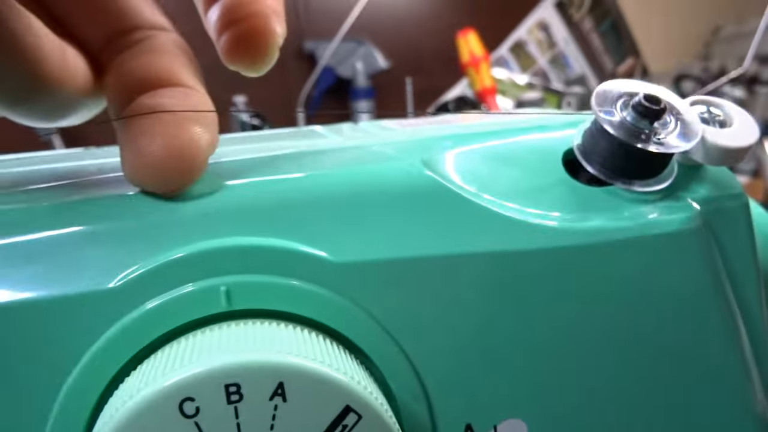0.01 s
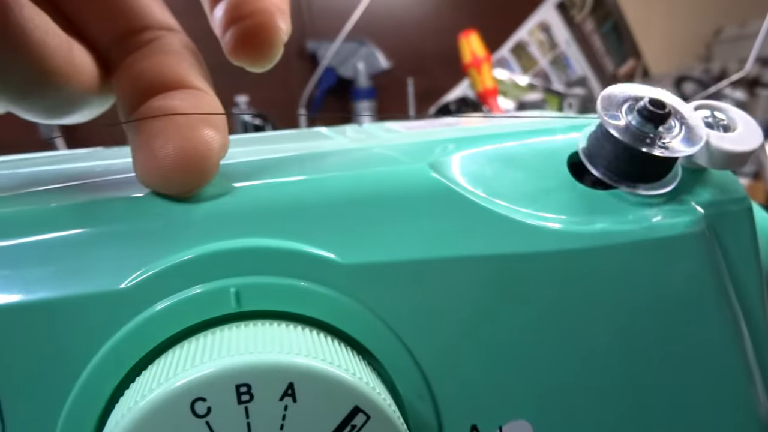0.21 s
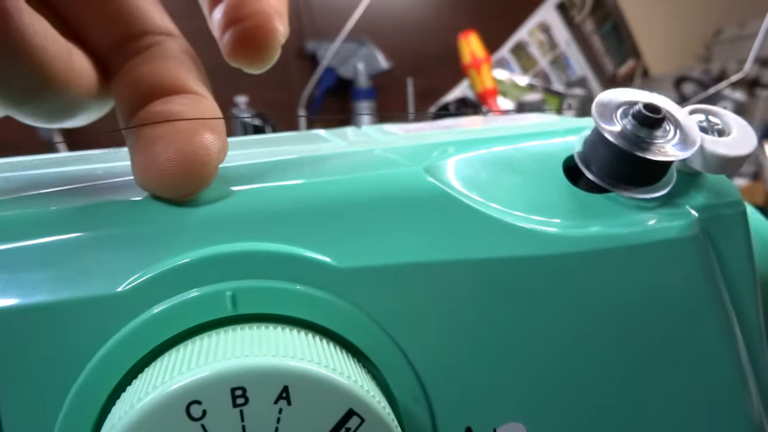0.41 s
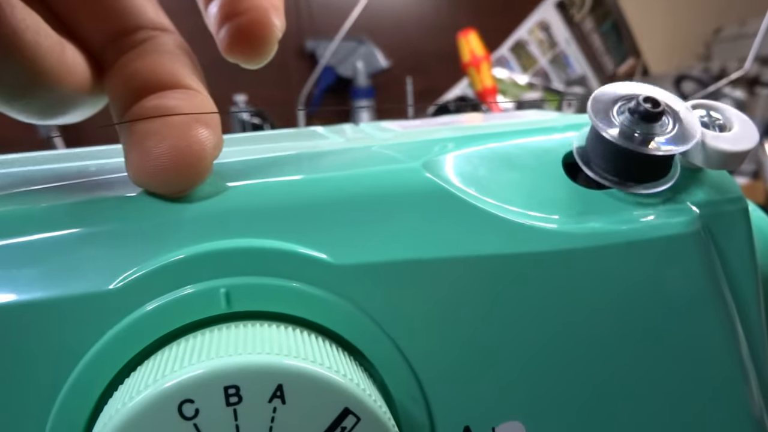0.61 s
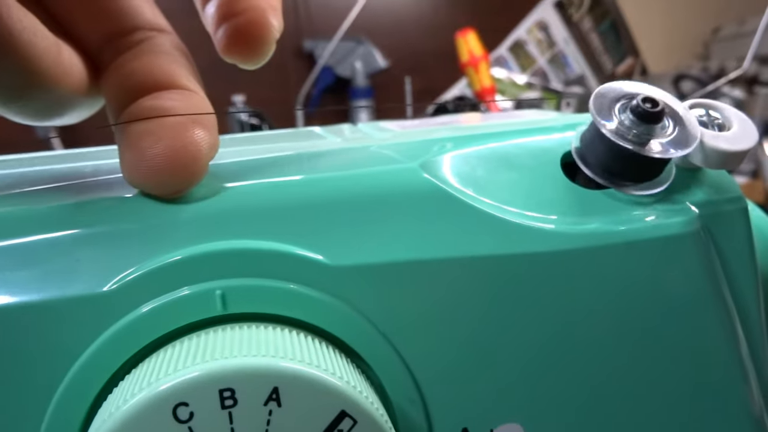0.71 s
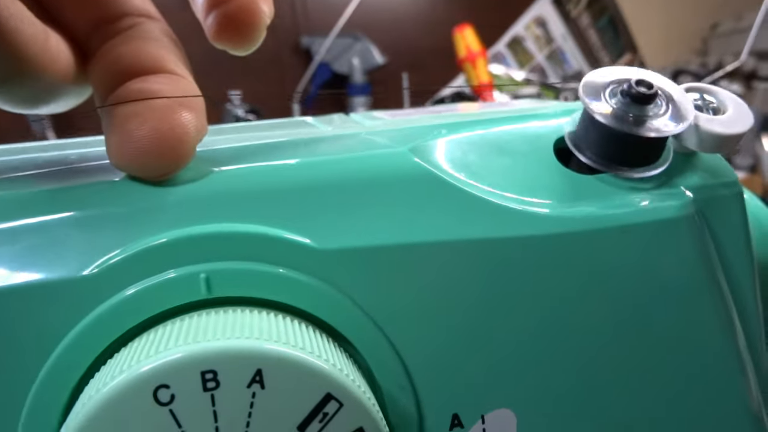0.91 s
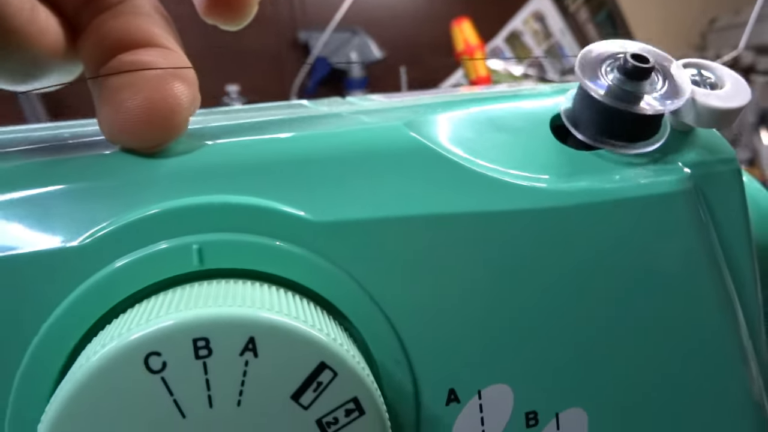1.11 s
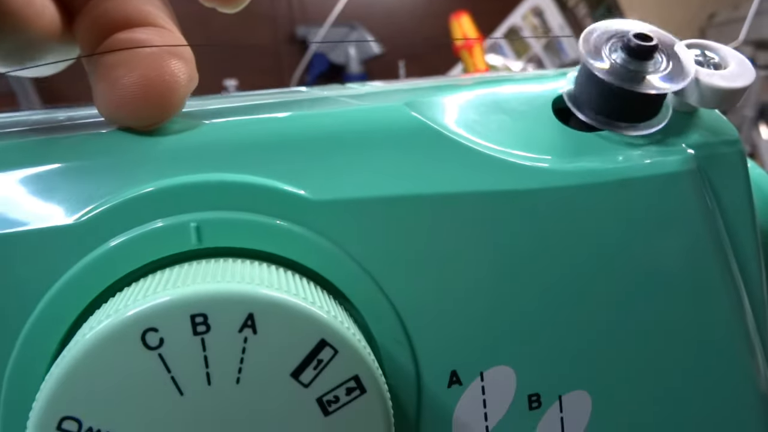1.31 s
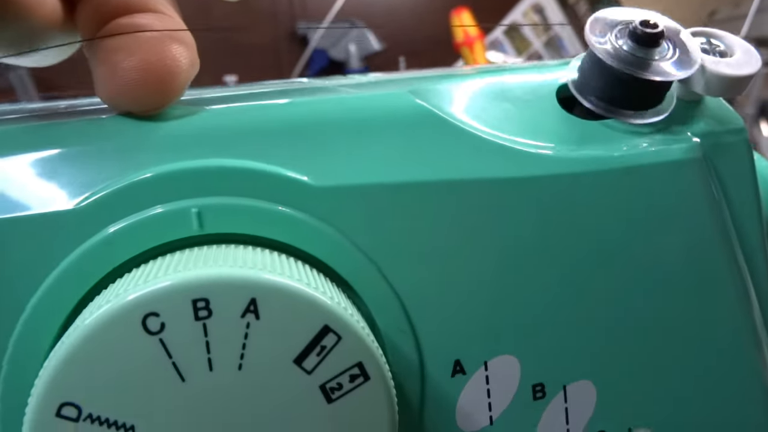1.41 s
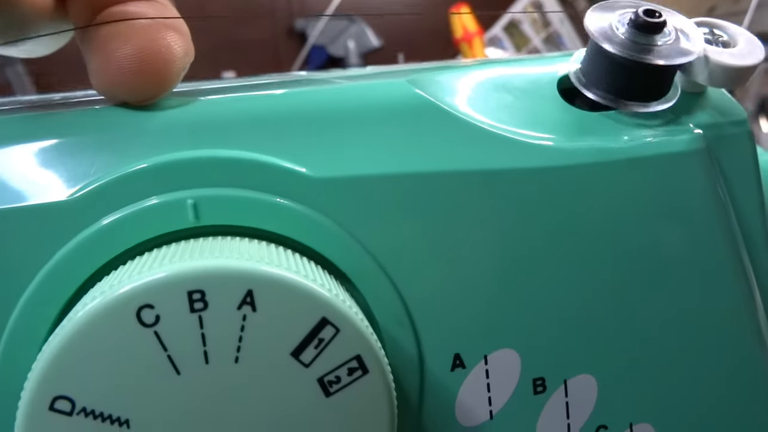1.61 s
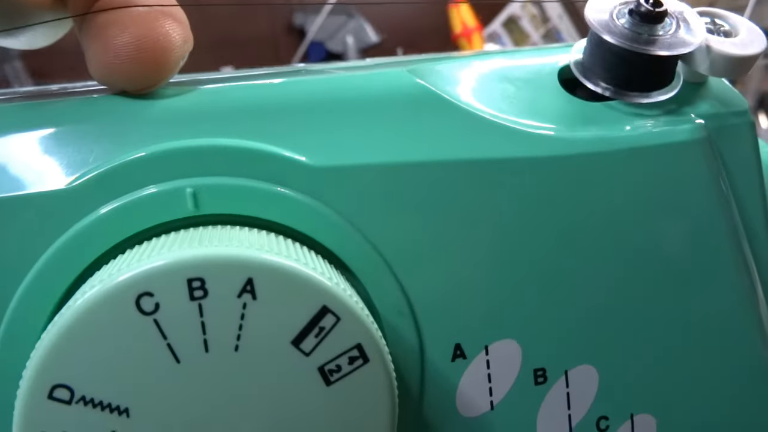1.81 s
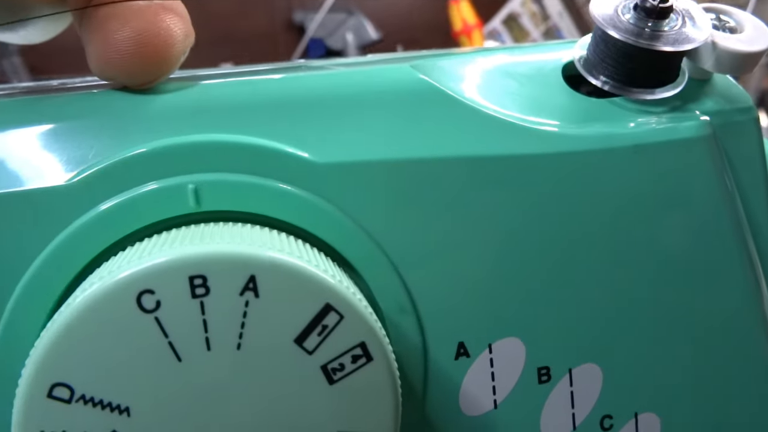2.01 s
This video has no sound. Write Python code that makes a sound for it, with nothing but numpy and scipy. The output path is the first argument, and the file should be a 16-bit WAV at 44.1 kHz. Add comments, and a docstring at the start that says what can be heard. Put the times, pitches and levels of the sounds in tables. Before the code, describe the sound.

A sewing machine motor winds a bobbin up close: a rough whine climbs quickly, plastic housing rattles and whirrs at full speed with metallic ticks, then it slows into separate knocks and stops in a small quiet room.

```python
"""A small room, microphone close to a sewing machine winding a bobbin in one short burst of the pedal.
The motor runs up with a rough wavering whine, and the shell drones at full speed over a mains hum.
Random contacts in the drive whirr and rattle the plastic housing; the bobbin ticks as ringing noise bursts.
As it coasts down the rattle fades to separate swelling knocks, with one strong knock near the end."""
import sys
import numpy as np
from scipy import signal
from scipy.fft import rfft, irfft, next_fast_len
from scipy.io import wavfile

SR = 44100
rng = np.random.default_rng(int(sys.argv[2]) if len(sys.argv) > 2 else 0)


def unload_wav(signal):
    """Save mono or channel-first audio to the path in sys.argv[1] as 16-bit WAV at rate SR, clipped to [-1, 1]."""
    wavfile.write(
        sys.argv[1],
        SR,
        np.round(np.clip(np.atleast_2d(signal).T, -1, 1) * 32767).astype(np.int16),
    )


N = 90405
T = np.arange(N) / SR  # time in s


def amp(db):
    """Decibels to gain."""
    return 10 ** (np.asarray(db) / 20)


def unit(x):
    """Scale to rms 1."""
    return x / np.sqrt(np.mean(x ** 2) + 1e-20)


def curve(rows):
    """Each column of a table after the first, joined by straight lines in time."""
    s, *columns = np.transpose(rows)
    return [np.interp(T, s, c) for c in columns]


def drift(rate_hz):
    """Random wander of rms 1: noise through two equal low-pass poles at the given rate."""
    r = np.exp(-2 * np.pi * rate_hz / SR)
    noise = rng.standard_normal(2 * N)
    return unit(signal.lfilter([1], [1, -2 * r, r * r], noise)[N:])  # settled half only


def colour(x, points):
    """Causal minimum-phase filter through the given [freq_hz, level_db] points."""
    size = 2 * next_fast_len(N)
    hz, db = np.transpose(points)
    bins_hz = np.arange(size // 2 + 1) * SR / size
    response_db = np.interp(np.log(bins_hz + 1), np.log(hz), db)
    cepstrum = irfft(np.log(amp(response_db)))
    cepstrum[1:size // 2] *= 2  # folding the cepstrum makes the filter causal
    cepstrum[size // 2 + 1:] = 0
    return irfft(rfft(x, size) * np.exp(rfft(cepstrum)))[..., :N]


def highpass(x, hz):
    """Second-order cut of the bass."""
    return signal.sosfilt(signal.butter(2, hz, "high", fs=SR, output="sos"), x)


def ring(x, hz, t60):
    """A resonant mode: a unit click sets a sine of height 1 ringing, down 60 dB after t60 seconds."""
    r, w = np.exp(-np.log(1000) / (t60 * SR)), 2 * np.pi * hz / SR
    return signal.lfilter([0, np.sin(w)], [1, -2 * r * np.cos(w), r * r], x + 1e-18)


def clicks(s, db):
    """Single-sample clicks at given times and levels."""
    return np.bincount((np.abs(s) * SR).astype(int), amp(db), N)[:N]


def grains(per_s, spread_db):
    """Random contacts of uneven size and either sign, at a given mean rate."""
    sizes = amp(spread_db * np.minimum(rng.exponential(1, N), 3))
    signed = sizes * rng.choice([-1, 1], N)
    return unit(signed * (rng.random(N) < per_s / SR))


def tone(hz, db, jitter, flutter_db, rate):
    """A sine that wavers at random in pitch (jitter, a fraction) and strength (flutter)."""
    phase = 2 * np.pi * np.cumsum(hz * (1 + jitter * drift(rate))) / SR
    strength = unit(amp(flutter_db * drift(rate)))
    return np.sqrt(2) * amp(db) * strength * np.sin(phase)


def room_floor():
    """The quiet room: steady noise, darker than white."""
    # tone of the room noise [freq_hz, level_db]
    floor_colour = [(25, -12), (100, -0.5), (600, -3), (1000, -12), (3000, -17.5), (11000, -21)]
    floor_db = -61
    return amp(floor_db) * unit(colour(rng.standard_normal(N), floor_colour))


def housing(x):
    """The plastic shell rings in its modes, alternating in sign."""
    # modes of the plastic housing [freq_hz, level_db, t60_s]
    modes = [(231.3, -24.5, 0.21), (265.6, -31, 0.16), (348.5, -15, .13), (387, -10.5, 0.088),
             (426.6, -12.5, 0.13), (511.7, -10, .11), (634.8, -2, 0.073), (671.8, -0.5, 0.049),
             (723, -5.5, 0.083), (766.3, -9.5, 0.079), (983, -12, 0.057), (1079, -10.5, 0.084),
             (1223, -11, 0.13), (1463, -19.5, 0.036)]
    return sum((-1) ** k * amp(db) * ring(x, hz, t60) for k, (hz, db, t60) in enumerate(modes))


def knocks():
    """Slack in the drive knocks: a hollow note swells and dies over the housing; the stop rings the frame."""
    # knocks of the slack drive on the housing [start_s, level_db, pitch_hz, swell_s]
    knock_rows = [(0.022, -49, 598, 0.0035), (0.129, -27.5, 660, 0.0046), (0.229, -34, 630, .005),
                  (0.257, -18.5, 694, 0.0137), (0.316, -21.5, 684, 0.0042), (0.465, -18, 630, 0.0086),
                  (0.514, -10.5, 653, .007), (0.628, -17.5, 627, 0.0091), (0.841, -16.5, 682, 0.0074),
                  (0.893, -14, 650, 0.0056), (1.348, -17, 637, 0.0059), (1.364, -18.5, 678, 0.015),
                  (1.435, -22, 685.5, 0.0035), (1.461, -21, 649, 0.0071), (1.485, -24.5, 650, 0.0035),
                  (1.504, -23.5, 663, 0.0058), (1.534, -23, 654, .004), (1.569, -30.5, 690, 0.0031),
                  (1.591, -23.5, 655, 0.0069), (1.644, -22, 658, 0.0065), (1.69, -21.5, 657, 0.0041),
                  (1.719, -28, 695, 0.01), (1.743, -18.5, 723.6, 0.00814), (1.827, -39, 714, 0.0048),
                  (1.852, -44.5, 402, 0.011), (1.947, -50, 600, .004)]
    # tone of the housing behind the knocks [freq_hz, level_db]
    knock_colour = [(40, -37), (200, -7), (350, 6.5), (600, 0.5), (780, 0), (1000, 6), (1300, -4),
                    (3000, -35)]
    # frame modes as the drive comes to rest against it [freq_hz, level_db, t60_s]
    frame = [(386, -41.5, 0.44), (513, -26, 0.21), (793, -30, 0.04), (1430, -36, .07), (1600, -38, 0.12)]
    stop_s, body_db = 1.749, -9.5

    hollow = 0
    for start, db, hz, swell in knock_rows:
        age = np.maximum(T - start, 0)
        envelope = (age / swell * np.exp(1 - age / swell)) ** 2  # peaks at 1 after the swell time
        hollow = hollow + amp(db) * envelope * np.sin(2 * np.pi * hz * age)

    s, db, _, swell = np.transpose(knock_rows)
    strikes = clicks(s + swell / 2, db)  # halfway through each swell time
    body = amp(body_db) * colour(housing(strikes), knock_colour)
    stop = sum((-1) ** k * ring(clicks([stop_s], [db]), hz, t60) for k, (hz, db, t60) in enumerate(frame))
    return hollow + body + highpass(stop, 300)


def drive(speed):
    """Fine contacts whirr, a little bunched on each turn; coarser ones shake the housing and its base."""
    # rattle of the drive in the housing [time_s, level_db]
    rattle_level = [(0, -75), (0.055, -61), (0.08, -41.5), (0.16, -37.5), (0.23, -29.5), (0.44, -27),
                    (0.48, -19.5), (0.6, -22.5), (0.73, -19), (0.8, -26), (0.87, -19.5), (1.1, -24),
                    (1.23, -21.5), (1.38, -27), (1.42, -35), (1.5, -29.5), (1.6, -44), (1.73, -36),
                    (1.8, -46), (1.87, -52.5), (1.92, -57), (2.05, -69)]
    # whirr of belt and brushes [time_s, level_db]
    whirr_level = [(0, -86), (0.055, -76), (0.068, -55), (0.2, -37), (0.44, -30.5), (0.5, -26), (0.66, -27),
                   (1.22, -25.5), (1.36, -31), (1.43, -36.5), (1.52, -40), (1.6, -43), (1.78, -52),
                   (1.92, -63), (2.05, -72)]
    # tone of the whirr [freq_hz, level_db]
    whirr_colour = [(40, -59), (90, -18), (122, -11), (145, -20), (300, -6), (700, -3), (880, -1),
                    (1100, -3), (1600, 1), (2200, -2), (2750, -1.5), (3100, -5.5), (3350, -10), (4000, -12),
                    (4300, -18.5), (4900, -14), (5250, -13), (5500, -19), (6200, -21), (6600, -17.5),
                    (7600, -24), (11000, -23)]
    # brush hiss [time_s, level_db]
    hiss_level = [(0.05, -85), (0.09, -61), (0.18, -45), (0.42, -41.5), (0.55, -41), (1.22, -39),
                  (1.38, -42.5), (1.52, -47.5), (1.68, -61), (1.78, -74), (1.9, -82)]
    # tone of the brush hiss [freq_hz, level_db]
    hiss_colour = [(2000, 15), (4500, -31), (5200, 8), (6000, 2), (7600, -12), (9400, 3), (11000, -11)]
    # low growl in the base [time_s, level_db]
    growl_level = [(0.05, -75), (0.12, -55), (0.5, -49.5), (0.75, -34), (0.92, -40), (1.35, -42.5),
                   (1.5, -39), (1.6, -45.5), (1.75, -52), (1.9, -65.5)]
    # tone of the growl [freq_hz, level_db]
    growl_colour = [(80, -40.5), (150, -24), (172, -18), (198, -27), (227, 7.5), (243, -8.5), (266, -1),
                    (300, -18.5), (355, -3), (425, -6.5), (470, -22.5), (900, -53)]
    whine_per_turn, turn_depth, turn_jitter = 12, .22, .15  # cycles, share, fraction
    grains_per_s, grain_spread_db = 3500, 2.5
    rattles_per_s, rattle_spread_db = 420, 1

    turn_hz = speed / whine_per_turn * (1 + turn_jitter * drift(42.4))
    turns = np.cumsum(turn_hz) / SR
    bunching = 1 + turn_depth * np.cos(2 * np.pi * turns)

    fine = bunching * grains(grains_per_s, grain_spread_db)
    whirr = amp(curve(whirr_level)[0]) * unit(colour(fine, whirr_colour))
    hiss = amp(curve(hiss_level)[0]) * unit(colour(rng.standard_normal(N), hiss_colour))
    shakes = grains(rattles_per_s * bunching, rattle_spread_db)
    rattle = amp(curve(rattle_level)[0]) * unit(housing(shakes))
    growl = amp(curve(growl_level)[0]) * unit(colour(shakes, growl_colour))
    return whirr + hiss + rattle + growl


def motor(speed):
    """Whine broken up by random gain, the housing's drone at full speed, and mains hum while pedalled."""
    # whine of the motor [time_s, level_db]
    whine_level = [(0.06, -67.5), (0.22, -34), (0.275, -33), (0.295, -55), (0.32, -28.5), (0.41, -27),
                   (0.47, -32), (0.8, -38), (1.2, -40), (1.25, -32), (1.355, -24), (1.42, -40.5),
                   (1.7, -66)]
    # drone of the housing at full speed [time_s, pitch_hz, level_db]
    drone_rows = [(0.72, 485, -60), (0.81, 499.2, -34), (0.87, 505, -21.5), (1.03, 514, -27.5),
                  (1.14, 522.2, -32.5), (1.2, 526, -24), (1.28, 497, -53), (1.36, 480, -70)]
    # levels of the first three multiples of the mains [level_db]
    mains_db = [-67, -55, -61]
    rough, rough_hz = 0.83, 160  # depth and rate at which the whine breaks up
    mains_hz = 60.46
    pedal_down_s, pedal_up_s, pedal_fade_s = 0.075, 1.3, 0.035

    whine = tone(speed, curve(whine_level)[0], jitter=.04, flutter_db=1.3, rate=116)
    whine = whine * (1 + rough * drift(rough_hz)) / np.hypot(1, rough)
    drone = tone(*curve(drone_rows), jitter=0.0047, flutter_db=0.3, rate=35)
    pedal = np.clip(np.minimum(T - pedal_down_s, pedal_up_s - T) / pedal_fade_s, 0, 1)
    hum = sum(tone(mains_hz * (k + 1), db, jitter=.015, flutter_db=2.5, rate=10)
              for k, db in enumerate(mains_db))
    return whine + drone + pedal * hum


def bobbin():
    """Each tick is a dying spray of noise and a metallic ring kept going by small after-contacts."""
    # metal ticks of the bobbin on its spindle; brightness is the treble of the spray against its bass
    # [start_s, level_db, brightness_db, ring_hz, ring_db]
    ticks = [(0.064, -54.5, -7, 3100, -56), (0.473, -32, 3.5, 5160, -28), (0.485, -26.5, 5.5, 4868, -18.5),
             (0.524, -29, 1, 4960, -34), (0.551, -25, -1, 10500, -28), (0.59, -38, -9, 6900, -22),
             (0.615, -32, -0.5, 6950, -41), (0.712, -24, -6.5, 2696, -22), (0.836, -22.5, 0, 2745, -20),
             (0.94, -22.5, -7.5, 5513, -35), (1.214, -30.5, 2.5, 2715, -30), (1.242, -39, -4, 5010, -37),
             (1.324, -31.5, 2, 10290, -18), (1.494, -27, -13, 2460, -29), (1.572, -48, -8, 2686, -37),
             (1.644, -35.5, -5, 2680, -25.5), (1.645, -46, -13, 6840, -33), (1.654, -41, -23, 7160, -52),
             (1.719, -40.5, -22, 3600, -47), (1.751, -38, -33, 2610, -36.5), (1.76, -39, -31, 1520, -34.5),
             (1.792, -60, -15, 2616, -42), (1.845, -66, -5, 2600, -48.5), (1.948, -44, -13, 1610, -52)]
    # tone of the spray [freq_hz, level_db]
    tick_colour = [(200, -38), (900, -17), (1650, 10.5), (3500, -2.5), (4900, 5.5), (5900, -1), (6700, 3.5),
                   (7700, -1.5), (10500, -4)]
    spray_t60_s, split_hz = 0.069, 2900
    ring_cycles = 165  # cycles for a ring to fall 60 dB
    pair_split, pair_db = 0.039, -16  # each mode is a close pair: fractional spacing, second's level
    chatter_share, chatter_s = 0.84, 0.009  # strength and decay time of the after-contacts

    s, db, bright_db, _, _ = np.transpose(ticks)
    spray = unit(colour(rng.standard_normal(N), tick_colour))
    low, high = (signal.sosfilt(signal.butter(3, split_hz, kind, fs=SR, output="sos"), spray)
                 for kind in ("low", "high"))
    spray_fade = np.exp(-np.log(1000) / (spray_t60_s * SR))
    strikes = [clicks(s, db), clicks(s, db + bright_db)]
    dull, bright = signal.lfilter([1], [1, -spray_fade], strikes)
    out = low * dull - high * bright

    chatter = chatter_share * rng.standard_normal(N) * np.sqrt(2 / (chatter_s * SR))
    chatter_fade = np.exp(-1 / (chatter_s * SR))
    for start, _, _, hz, ring_db in ticks:
        hit = clicks([start], [ring_db])
        after = chatter * signal.lfilter([1], [1, -chatter_fade], hit + 1e-18)
        contact = hit / 2 + after
        t60 = ring_cycles / hz
        partner = amp(pair_db) * ring(contact, hz * (1 + pair_split), t60)
        out = out + ring(contact, hz, t60) - partner
    return out


def room(x):
    """A short wash of reflections: dying noise, starting 2 ms after the direct sound."""
    # tone and strength of the reflections [freq_hz, level_db]
    reflections = [(100, -13), (500, -24), (1400, -10.5), (3000, -9.5), (6000, -6.5), (11000, -8)]
    t60_s = 0.12
    response = rng.standard_normal(N) * np.exp(-np.log(1000) * T / t60_s) * (T > .002)
    wash = signal.fftconvolve(x, response / np.linalg.norm(response))[:N]
    return colour(wash, reflections)


def scene():
    """The machine up close with the room noise, spread to two sides by the reflections."""
    # motor speed as the pitch of its whine [time_s, pitch_hz]
    speed_rows = [(0.06, 150.6), (0.17, 418), (0.27, 701.5), (0.32, 990), (0.41, 1100), (0.55, 1241),
                  (0.85, 1359), (1.22, 1399), (1.3, 1197), (1.36, 1050), (1.41, 906.5), (1.55, 606),
                  (1.85, 149.6)]
    # tilt between the two sides [freq_hz, left_minus_right_db]
    balance = [(100, -0.7), (1400, -0.17), (3000, 0), (6000, 0), (9000, -1), (11000, -1)]
    speed, = curve(speed_rows)
    near = room_floor() + knocks() + drive(speed) + motor(speed) + bobbin()
    mid = near + room(near)  # reflections shared by both sides
    side = room(near)  # reflections opposite in sign on the two sides
    return np.array([colour(mid + sign * side, [(hz, sign * db / 2) for hz, db in balance])
                     for sign in (1, -1)])


def record(dry):
    """The microphone loses the deep bass; the top is cut steeply."""
    cutoff_hz = 11060
    thin = highpass(dry, 45)
    return signal.sosfilt(signal.ellip(12, .1, 80, cutoff_hz, fs=SR, output="sos"), thin)


dry = scene()
out = record(dry)
unload_wav(out)
```